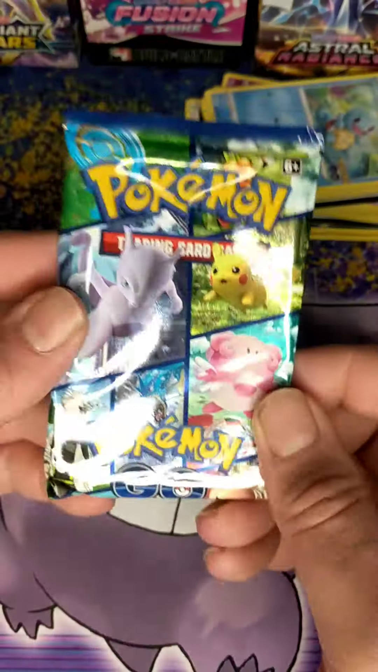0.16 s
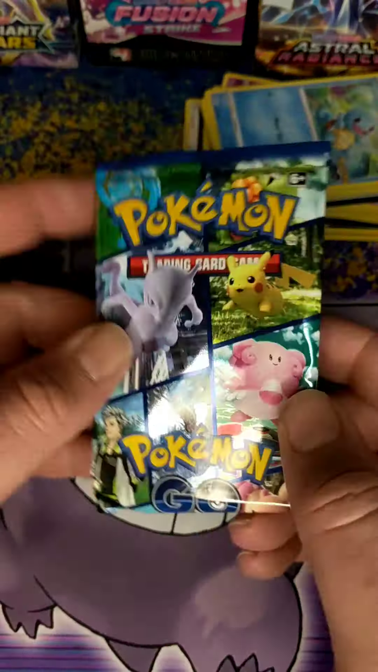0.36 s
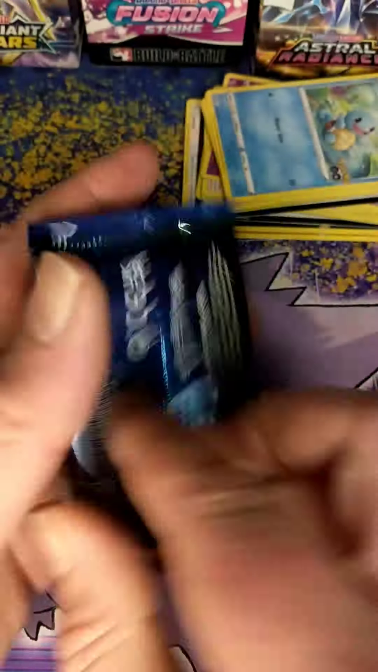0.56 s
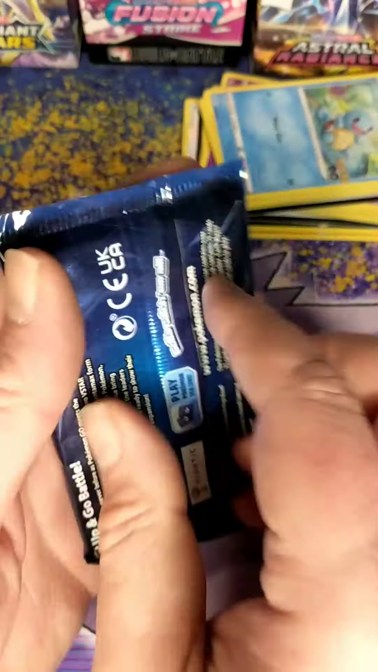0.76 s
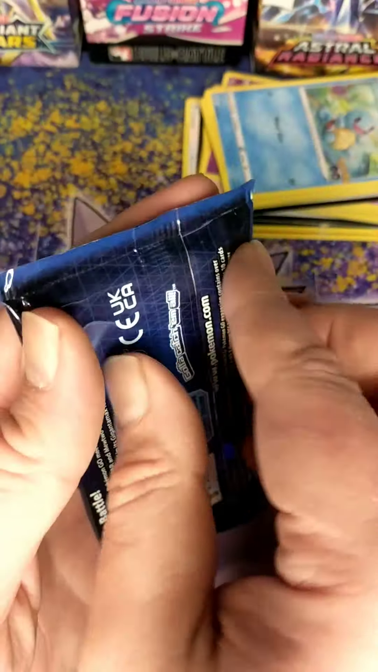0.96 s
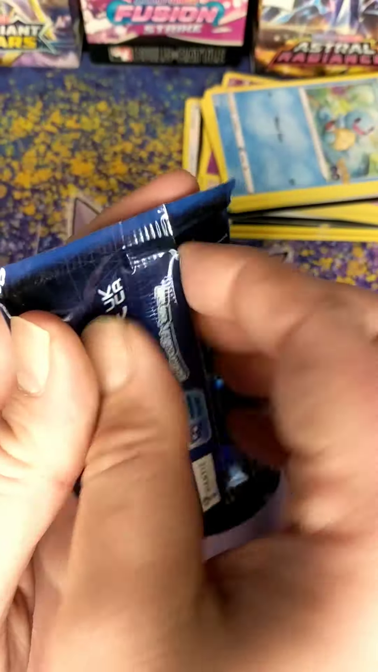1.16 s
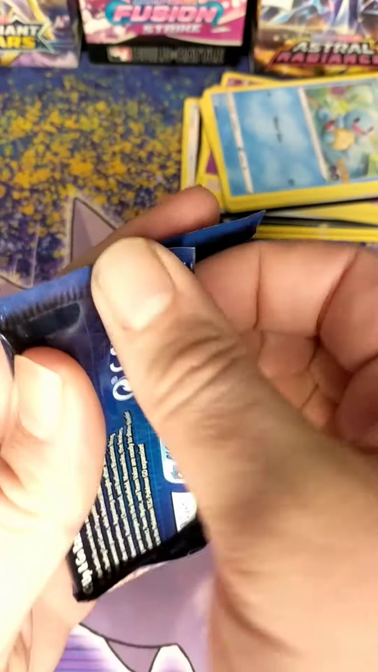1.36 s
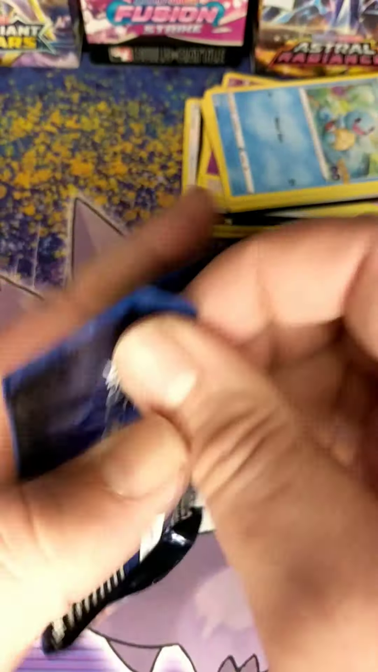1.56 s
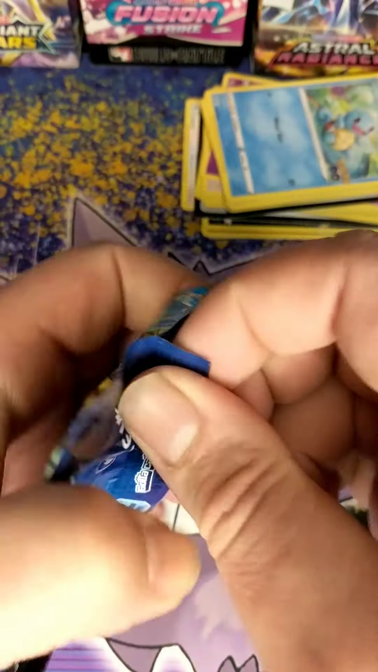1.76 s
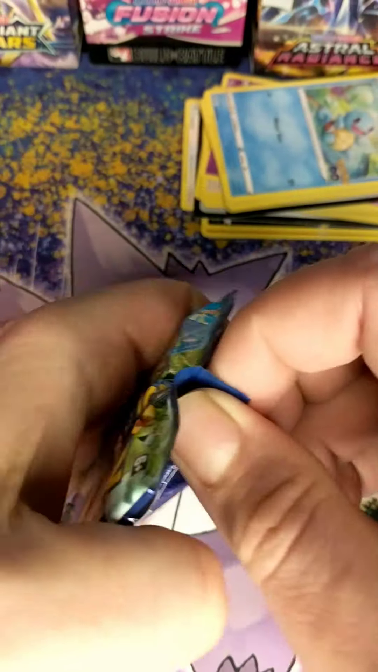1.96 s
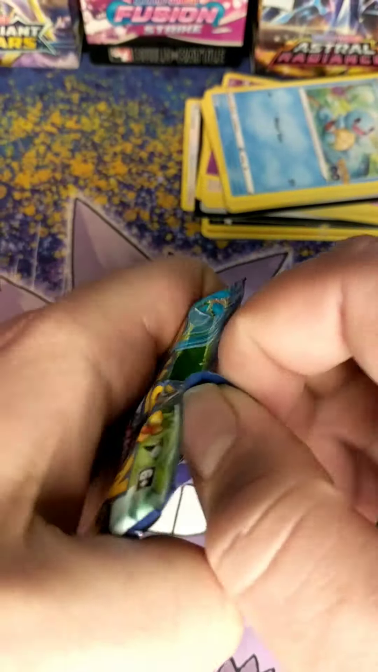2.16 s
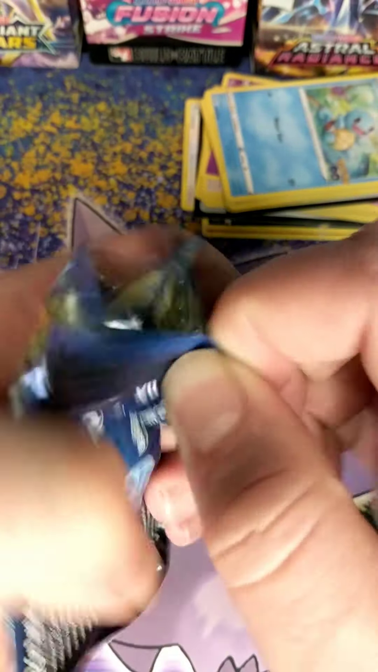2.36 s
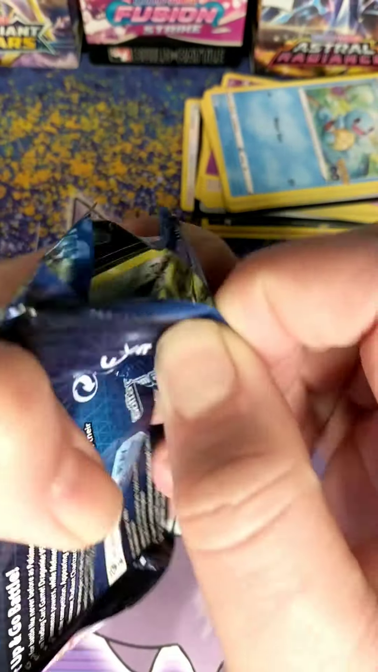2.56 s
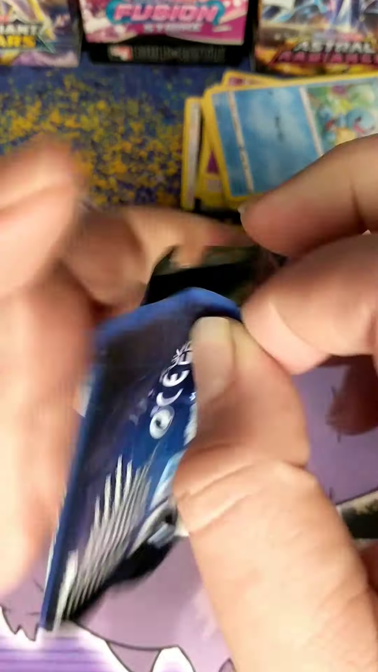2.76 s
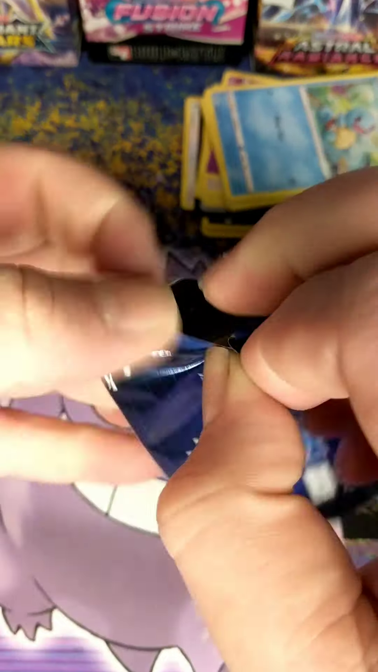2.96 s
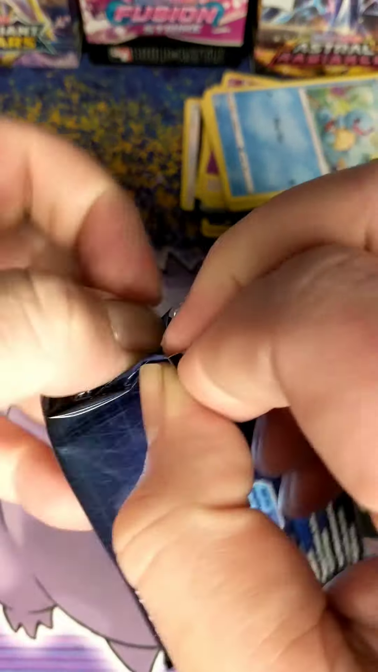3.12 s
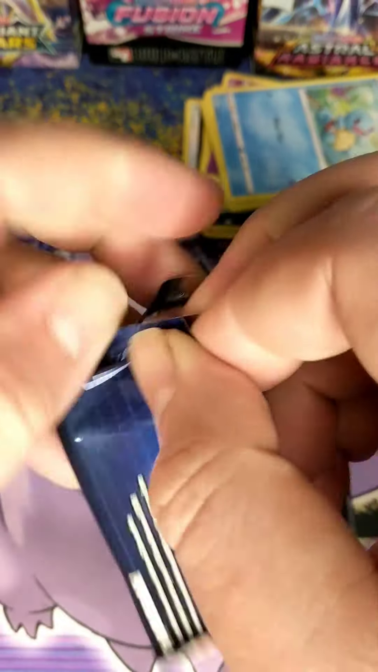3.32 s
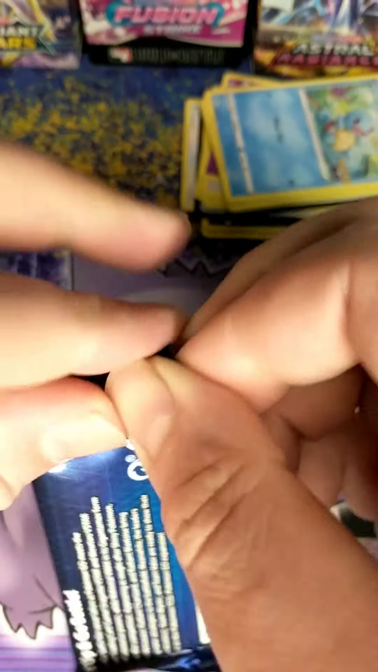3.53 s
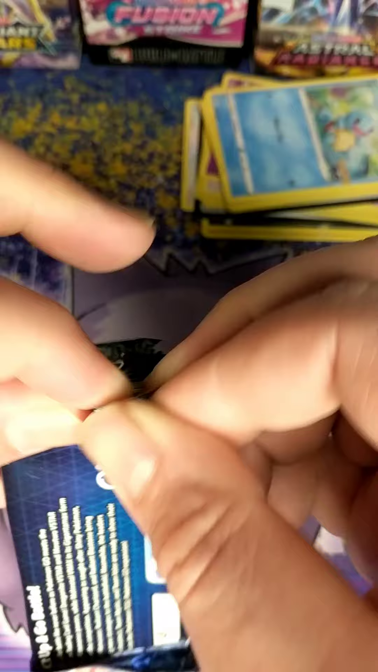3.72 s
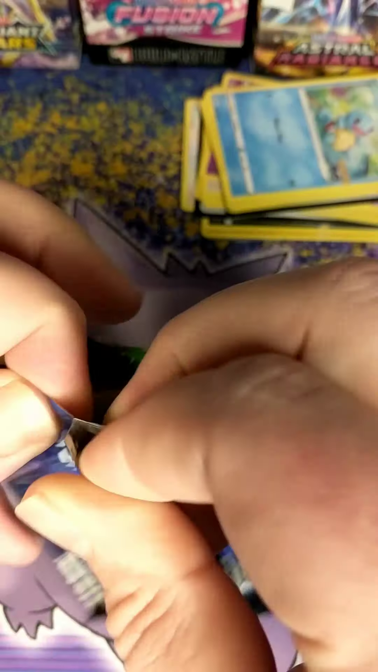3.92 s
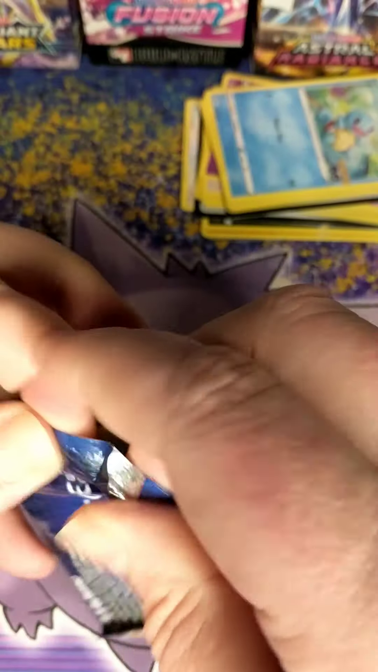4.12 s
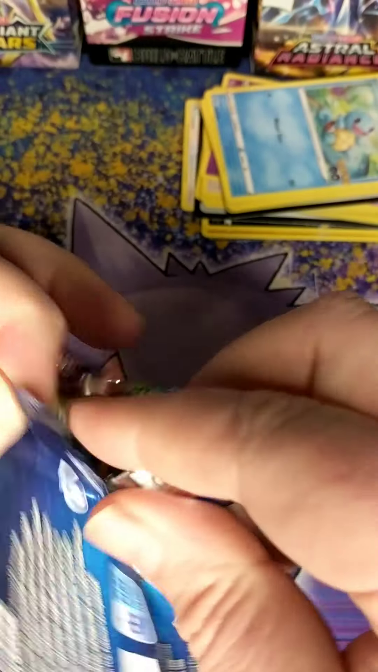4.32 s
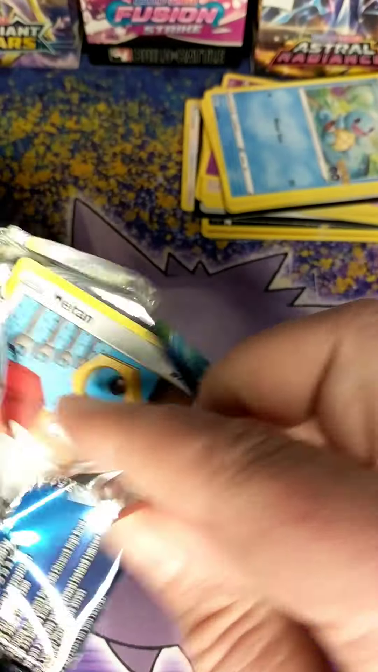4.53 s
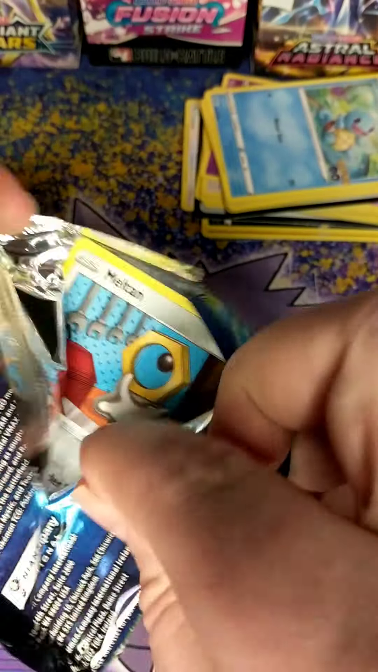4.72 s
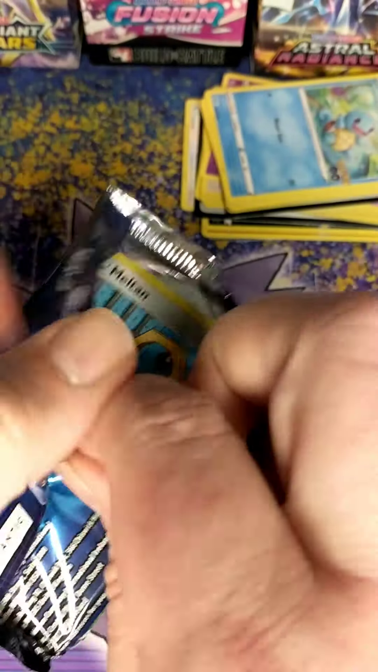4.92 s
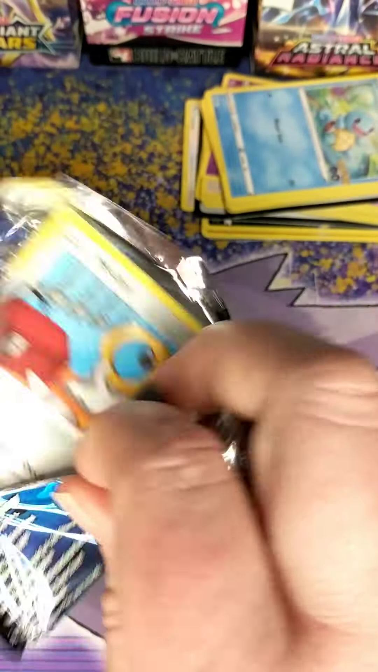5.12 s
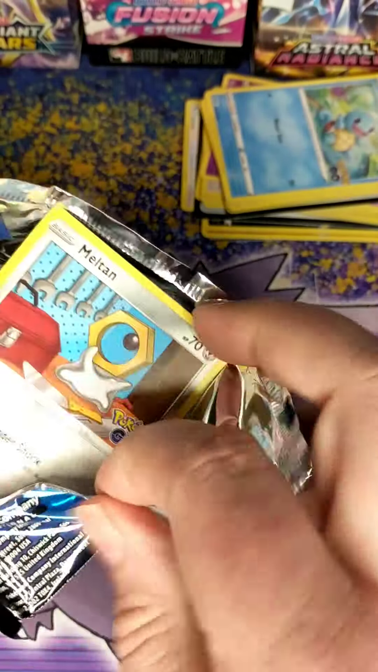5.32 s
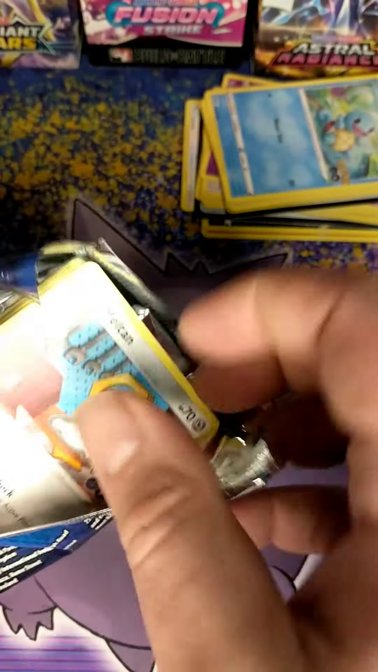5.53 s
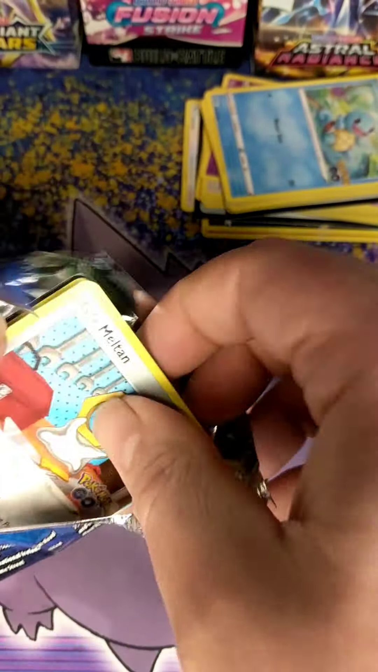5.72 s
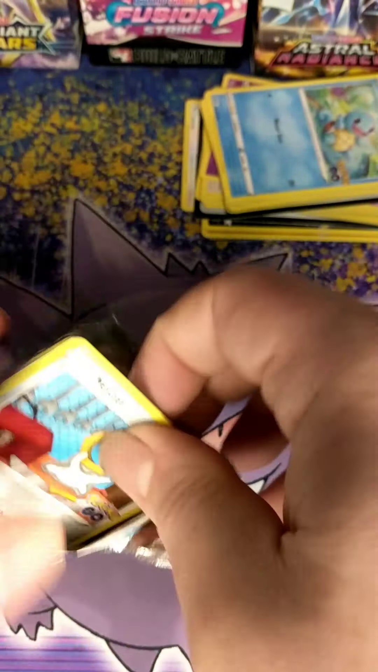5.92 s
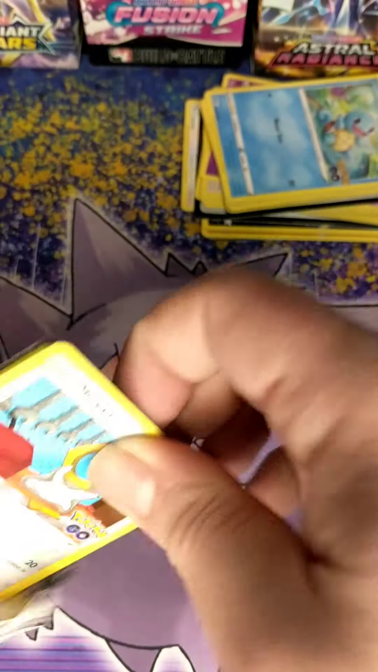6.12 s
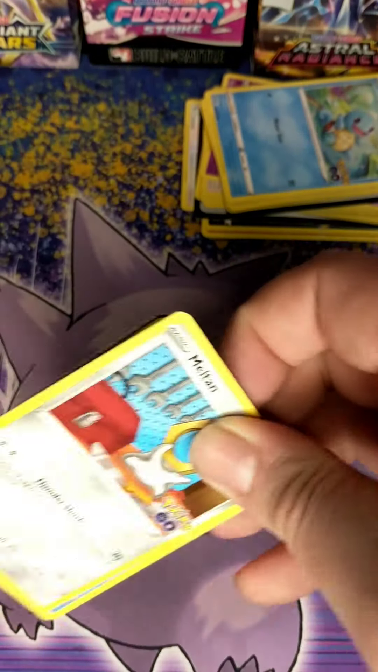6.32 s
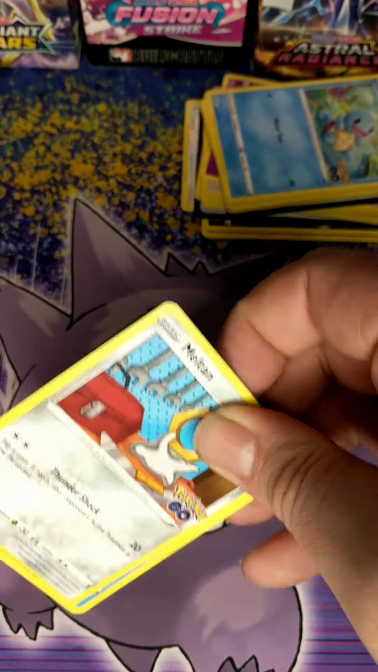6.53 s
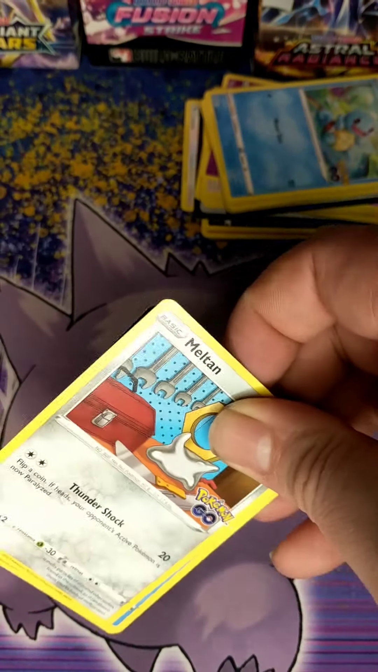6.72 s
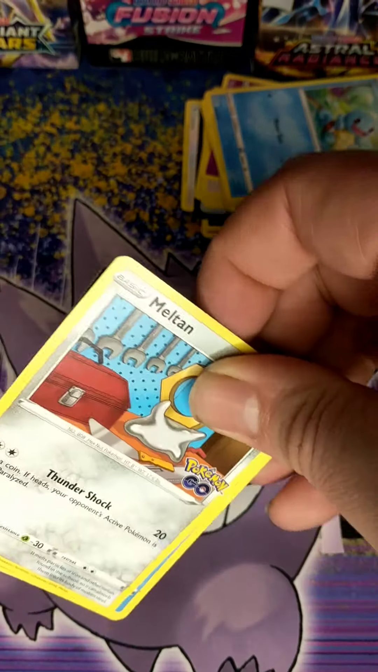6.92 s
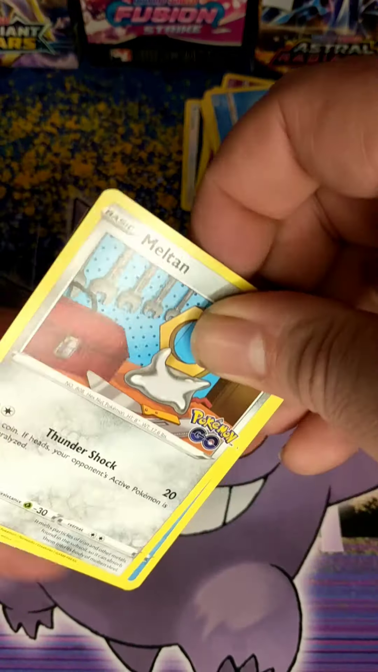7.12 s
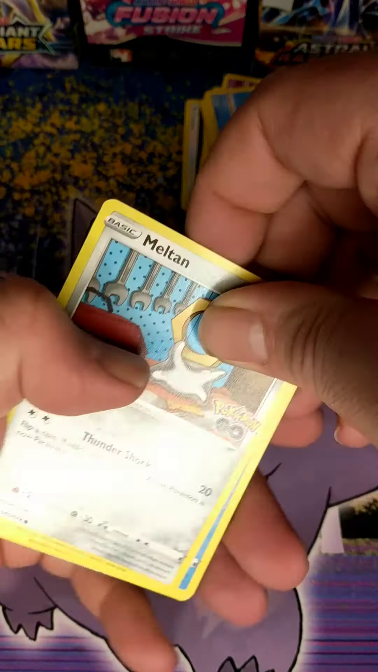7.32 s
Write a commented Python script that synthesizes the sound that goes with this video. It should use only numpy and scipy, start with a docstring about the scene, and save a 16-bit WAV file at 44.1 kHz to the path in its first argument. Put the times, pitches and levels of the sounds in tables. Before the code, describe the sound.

Bright, dry foil crinkling, close-miked indoors. Sharp single buckles stand out over fine crackle and soft skin rubbing. The loudest moment is a hard crack with a low puff of air around a third of the way in. A calmer stretch follows, then busy rustling with brief rips and hollow card scraping, ending in near silence over a low hum and quiet air.

```python
"""Opening a foil card pack

Hands squeeze a foil pack close to a microphone, run a nail over its crimp, tear it and slide the cards.
Stiff film buckles in single snaps over swarms of tiny creases, each a short coloured click; the nail and
the tears are fast runs of clicks. Skin rubs as a soft hiss, air puffs as a damped swing, and card edges
scrape as ringing noise. A small, dead room adds a weak echo, with a fan's low rush and a hum behind."""
import sys
import numpy as np
from scipy import signal
from scipy.fft import rfft, irfft, next_fast_len
from scipy.io import wavfile
from scipy.ndimage import uniform_filter1d, map_coordinates

SR = 44100
rng = np.random.default_rng(int(sys.argv[2]) if len(sys.argv) > 2 else 0)


def int16_out(signal):
    """Quantize to a 16-bit WAV file."""
    q = np.round(np.clip(np.atleast_2d(signal).T, -1, 1) * 32767)
    wavfile.write(sys.argv[1], SR, q.astype(np.int16))


N = 329850
TIME = np.arange(N) / SR  # seconds

# Background air. Each row: frequency in Hz, relative strength in dB per Hz.
AIR_SPECTRUM = [(20, -41), (40, -25.5), (62, -2.5), (85, 2.5), (115, -12), (200, -14), (270, -12),
                (360, -18), (700, -20), (1200, -25.5), (2000, -25), (5000, -35), (10000, -40.5),
                (15500, -48.5)]
# Steady hum. Each row: frequency in Hz, rms level in dB.
HUM_TONES = [(84, -60.5), (120, -63), (166, -62.5), (240, -60)]
# Steady strain of holding the pack. Each row: time in seconds, flexing in dB.
GRIP = [(0, -63), (.25, -73), (.5, -63.5), (.75, -51), (1.03, -61), (1.33, -47), (1.55, -47.5), (1.75, -58),
        (2.5, -61), (2.8, -43), (3.25, -48), (3.53, -56), (4.1, -50), (4.72, -44), (4.9, -59), (5.05, -44),
        (5.3, -45), (5.55, -53.5), (6.1, -48), (6.29, -68), (7.47, -71)]
# Fingers squeeze or pull the film. Each row: start in seconds, hold in seconds, flexing in dB.
SQUEEZES = [(0.061, .01, -42), (0.354, .05, -46), (0.523, .008, -41), (0.58, .03, -29), (.64, .055, -41),
            (0.826, .03, -42), (1.136, .045, -36), (1.40, .065, -37), (1.53, .05, -39), (1.925, .02, -40.5),
            (2.65, .125, -31), (2.843, .055, -33), (2.998, .025, -35), (3.08, .05, -35), (3.202, .07, -40),
            (3.386, .1, -36), (3.565, .02, -38.5), (3.635, .018, -28), (3.775, .04, -40),
            (3.977, .018, -33), (4.137, .06, -44), (4.311, .035, -29), (4.36, .055, -26),
            (4.548, .006, -35), (4.586, .02, -31), (4.765, .035, -30), (5.055, .05, -30),
            (5.135, .058, -28), (5.331, .015, -35), (5.441, .025, -30), (5.91, .03, -31), (5.99, .19, -33),
            (6.188, .07, -36), (6.449, .035, -56), (7.166, .03, -56), (7.388, .03, -59)]
# Every finger move and every scrape builds up and relaxes at the same pace.
BUILD_DB_PER_S, RELAX_DB_PER_S = 900, 600.5
# The film goes on creasing after a snap: level against the snap, upper limit, speed of fading.
SETTLE_DB, SETTLE_MOST_DB, SETTLE_DB_PER_S = -20, -39, 431
# Colour of a tiny crease. Each row: frequency in Hz, relative strength in dB per Hz.
CREASE_SPECTRUM = [(100, -8), (350, -7), (700, -4.5), (1400, -3), (2600, -1.5), (4500, 0.5), (7000, -2.5),
                   (10500, -4), (13500, -4.5), (16000, -8.5)]
# Tight creases are bright, loose film is dull. Each row: time in seconds, brightness in dB per octave.
TAUTNESS = [(.6, 0.5), (1.3, 2), (2.4, -3), (2.9, 4), (3.2, -1), (3.9, -0.5), (4.55, 0), (4.95, 1.5),
            (5.08, 2.5), (5.5, -4), (6.1, 0)]
# Colour of a flipping facet. Each row: frequency in Hz, relative strength in dB per Hz.
FACET_SPECTRUM = [(100, -27.5), (350, -29.5), (650, -10.5), (1150, -7.5), (1700, 0), (2600, 2.5),
                  (4500, 3.5), (8000, 1.5), (11000, -2), (15500, -4.5)]
# Air resonances of the hollow pack. Each row: frequency in Hz, width in Hz, gain in dB.
POUCH_MODES = [(1100, 1000, -6.5), (2470, 140, 1.5)]
# How strongly the hollow pack colours the rustle. Each row: time in seconds, strength, about 0.8 to 1.
POUCH_STRENGTH = [(4.3, 1), (4.48, 0.8), (4.95, 0.9), (5.8, 1)]
# Loud buckles. Each row: start in seconds, rms level in dB over 5 ms,
# centre of the colour boost in Hz (low for dull snaps, high for bright ones), brightness in dB per octave.
SNAPS = [(.385, -31.5, 1002, 3), (0.5804, -27.5, 3620, 3.5), (0.5995, -18.5, 685, 1.5),
         (0.7152, -16, 2000, 0.5), (0.7489, -29, 1920, -3.5), (.846, -20, 4980, 1),
         (0.9712, -25.5, 5300, -4.5), (1.0642, -22, 2800, 3.5), (1.1312, -13.5, 3040, 1),
         (1.2353, -25.5, 3800, -2.5), (1.2444, -12.5, 9200, 8.5), (1.357, -30.5, 860, -3.5),
         (1.39, -17.5, 3850, 1), (1.3953, -19, 5430, -4.5), (1.408, -26, 850, -5), (1.424, -29.5, 800, -3),
         (1.4419, -12.5, 6840, 10.5), (1.4538, -21.5, 690, 1), (1.4802, -21, 5840, -2),
         (1.506, -19, 13300, 1), (1.5271, -15.5, 704, 3.5), (1.547, -24.5, 714, 7), (1.5971, -14.5, 700, 6),
         (1.6335, -17.5, 11400, -5), (1.686, -24.5, 670, -.5), (1.788, -25, 1970, 2),
         (1.8269, -21.5, 2050, 2), (1.834, -26, 3130, 1), (1.908, -25.5, 785, -4),
         (1.937, -24.5, 10100, -1.5), (2.0129, -21, 756, 0.5), (2.1348, -24, 4000, -3),
         (2.251, -14.5, 6600, -0.5), (2.305, -18.5, 12800, -1), (2.3417, -24, 3000, -0.5),
         (2.344, -13, 12900, -5), (2.36, -7, 2780, 4), (2.368, -14, 3470, 0.5), (2.3844, -17, 2330, 0.5),
         (2.516, -25, 704, 1.5), (2.56, -29, 4600, -3), (2.6511, -19.5, 6350, -4.5),
         (2.6657, -16.5, 701, 4.5), (2.6907, -14.5, 3950, -5.5), (2.7497, -26, 12300, -3.5),
         (2.7696, -22, 700, 2), (2.8114, -23.5, 7440, -2), (2.936, -27, 7270, 5.5),
         (2.9505, -17, 7500, 6.5), (2.9572, -15.5, 7300, 4.5), (2.964, -18, 7160, 5.5),
         (3.007, -21.5, 650, 1.5), (3.0253, -32.5, 14000, 0), (3.056, -23, 1500, 2.5),
         (3.1113, -26, 3200, 2), (3.1249, -20.5, 885, -1), (3.207, -31.5, 1660, -1.5),
         (3.407, -26, 12000, -1.5), (3.4561, -24.5, 6440, 6), (3.5379, -24, 3810, 2),
         (3.659, -20, 12400, -5.5), (3.7564, -21, 1650, 0.5), (3.8, -24, 2420, -2), (3.9768, -16, 696, 6.5),
         (3.9908, -20, 1250, 0.5), (4.0726, -31, 1550, -2.5), (4.222, -22, 9300, -1),
         (4.2303, -27, 6700, 4.5), (4.2806, -24, 2350, -1), (4.3061, -23.5, 3450, -2.5),
         (4.3166, -15.5, 12800, -0.5), (4.3235, -19, 12500, -3), (4.3393, -22, 3000, -5),
         (4.3571, -18, 2050, 0.5), (4.4015, -15.5, 2480, 1), (4.4135, -18.5, 2780, 2),
         (4.4617, -18, 2570, -6), (4.5134, -17.5, 2500, -5.5), (4.611, -24.5, 4300, 4),
         (4.6775, -25, 1120, -0.5), (4.7471, -15, 2700, -5.5), (4.849, -26, 2700, 1),
         (4.949, -23, 2730, -6.5), (4.9662, -14, 960, -4), (4.9943, -25.5, 3000, -1),
         (5.0308, -14, 2900, 8), (5.131, -12, 12900, 2.5), (5.1605, -16.5, 710, 0),
         (5.2267, -19, 8360, -1.5), (5.2753, -25, 1190, -3), (5.319, -26.5, 2640, -4.5),
         (5.3826, -26, 1251, -8), (5.446, -14.5, 2150, -0.5), (5.4578, -22, 1730, -1),
         (5.466, -21, 1070, -8.5), (5.5436, -22.5, 1450, -3), (5.587, -29.5, 2580, 0.5),
         (5.6605, -24, 4320, -7), (5.7094, -17, 8100, -6), (5.7655, -24, 4460, -6.5),
         (5.8417, -25.5, 3450, 1.5), (5.8653, -20.5, 2600, -2), (5.879, -18, 2550, -0.5),
         (5.934, -29.5, 2800, -3), (5.977, -16, 700, 2.5), (6.013, -24.5, 1800, 0.5),
         (6.0282, -20, 9000, 0.5), (6.0435, -23, 3610, 2), (6.1221, -19, 12500, -6),
         (6.186, -22, 4000, -3.5), (6.238, -29, 4000, -1.5), (6.263, -30.5, 4200, 2.5),
         (6.3567, -47.5, 7250, -5), (6.5352, -32.5, 4520, 7.5), (6.774, -38.5, 2500, 1)]
# Pushes of air from the pack. Each row: start in seconds, level in dB.
PUFFS = [(0.599, -32.5), (2.3435, -19.5), (2.665, -36), (2.69, -32.5), (2.751, -30.5)]
# Fast runs of clicks: a nail drawn over the crimp ribs, or film tearing. Each row: start in seconds,
# length in seconds, clicks per second, starting level in dB, starting centre of the colour boost in Hz,
# average brightness in dB per octave.
CLICK_RUNS = [(1.267, 0.042, 430, -28, 3500, 1), (2.352, 0.0067, 1200, -18.5, 4000, 1),
              (2.3577, 0.031, 1270, -16.5, 2500, -2), (2.858, 0.057, 440, -32, 6000, 5.5),
              (4.362, 0.058, 340, -24.5, 2820, -4.5), (5.143, 0.048, 480, -26, 2900, -4.5)]
# Cards scrape inside the pack. Each row: start in seconds, hold in seconds, rms level in dB.
SCRAPES = [(4.475, 0.01, -34), (4.594, 0.009, -39), (4.695, 0.15, -42.5), (4.76, 0.039, -34.5),
           (4.877, .07, -46), (4.944, 0.0068, -29.5), (5.46, 0.018, -42)]
# What a scrape rings with. Each row: frequency in Hz, width in Hz, relative strength in dB.
SCRAPE_MODES = [(940, 610, -4), (1394, 500, -6), (2580, 630, -1.5)]
# Decay of the room. Each row: frequency in Hz, seconds to fade by 60 dB.
ROOM_DECAY = [(200, 0.44), (2500, 0.11), (14000, 0.032)]
TOP_HZ = 15900  # the microphone's upper limit


def amp(db):
    """Turn dB into a plain multiplier."""
    return 10 ** (np.asarray(db) / 20)


def unit(x):
    """Scale each row to rms 1."""
    return x / np.sqrt(np.mean(x ** 2, axis=-1, keepdims=True) + 1e-20)


def along(points, hz):
    """Read (Hz, value) points on a log frequency axis."""
    f, v = np.transpose(points)
    return np.interp(np.log(hz + 1), np.log(f), v)


def curve(rows, s):
    """Read (seconds, value) rows at the times s."""
    return np.interp(s, *np.transpose(rows))


def wobble(rate):
    """A smooth random curve with this many random points a second."""
    knots = rng.standard_normal(int(N * rate / SR) + 4)
    return map_coordinates(knots, [TIME * rate])


def filtered(x, response):
    """Multiply the spectrum of x by a function of frequency."""
    m = next_fast_len(N + SR // 2)
    return irfft(rfft(x, m) * response(np.fft.rfftfreq(m, 1 / SR)), m)[:N]


def resonances(x, modes):
    """Pass x through a set of (Hz, width Hz, dB) resonances, side by side."""
    def response(f):
        return sum(amp(db) * 1j * f * width / (centre * centre - f * f + 1j * f * width)
                   for centre, width, db in modes)
    return filtered(x, response)


def causal(gain_db):
    """Minimum-phase responses with these gains: a sharp start, then ringing."""
    cepstrum = irfft(np.log(amp(gain_db)))
    half = cepstrum.shape[-1] // 2
    cepstrum[:, 1:half] *= 2
    cepstrum[:, half + 1:] = 0
    return np.exp(rfft(cepstrum))


def placed(times, waves):
    """Add up short waves, one row each, starting at the given times in seconds."""
    first = np.round(np.maximum(times, 0) * SR).astype(int)
    index = first[:, None] + np.arange(waves.shape[1])
    return np.bincount(index.ravel(), waves.ravel(), N)[:N]


def stroke(start, hold, db):
    """The level in dB of one move: it builds up, holds and relaxes."""
    before = BUILD_DB_PER_S * (start - TIME)
    after = RELAX_DB_PER_S * (TIME - start - hold)
    return db - np.maximum(np.maximum(before, after), 0)


def buckles(spectrum, boost_hz, tilt, boost_db, boost_octaves, flutter_db, flutter_t60, size=512, lag_s=.0005):
    """Clicks of energy 1: a facet flips and bending waves flutter over the film, the low ones lagging."""
    t, hz = np.arange(size) / SR, np.fft.rfftfreq(size, 1 / SR)
    # one sharp push, then fading noise for the flutter
    push = rng.standard_normal((len(tilt), size)) * amp(flutter_db - 60 * t / flutter_t60)
    push[:, 0] = 1
    octaves_away = np.log2((hz + 1) / boost_hz[:, None])
    boost = boost_db / (1 + (octaves_away / boost_octaves) ** 2)
    brightness = tilt[:, None] * np.log2(np.maximum(hz, 500))
    colour = along(spectrum, hz) + boost + brightness
    lag = np.exp(-4j * np.pi * lag_s * np.sqrt(1000 * hz))  # delay is lag_s at 1000 Hz, longer below
    return unit(irfft(rfft(push) * causal(colour) * lag)) / np.sqrt(size)


def background():
    """A fan's low rush is shaped noise; the hum is a few tones with slightly unsteady phase."""
    rush = unit(filtered(rng.standard_normal(N), lambda hz: amp(along(AIR_SPECTRUM, hz))))
    hum = np.zeros(N)
    for hz, db in HUM_TONES:
        phase = 2 * np.pi * hz * TIME + 0.26 * wobble(5.4)
        hum += amp(db) * np.sqrt(2) * np.sin(phase)
    return amp(-53.5) * rush + hum


def flexing():
    """How hard the film is worked, in dB: the strongest of grip, squeezes and settling after snaps."""
    flex_db = curve(GRIP, TIME)
    for row in SQUEEZES:
        flex_db = np.maximum(flex_db, stroke(*row))
    t = TIME[:SR // 8]
    for start, db, *_ in SNAPS:
        after = slice(int(start * SR), int(start * SR) + len(t))
        settling = min(db + SETTLE_DB, SETTLE_MOST_DB) - SETTLE_DB_PER_S * t
        flex_db[after] = np.maximum(flex_db[after], settling)
    return flex_db


def rubbing(flex_db, patchy_db=3.0, level_db=-55, grows=0.55, unsteady_db=5.5):
    """Skin and cards slide on the film: a soft hiss of shifting colour, louder with harder flexing."""
    z = signal.stft(rng.standard_normal(N), nperseg=512)[2]
    # random patches, smoothed over frequency and then over time
    field = uniform_filter1d(rng.standard_normal(z.shape), size=7, axis=0)
    field = uniform_filter1d(field, size=12, axis=1)
    patchy = signal.istft(z * amp(patchy_db * field / field.std()), nperseg=512)[1][:N]
    hiss = unit(filtered(patchy, lambda hz: amp(along(CREASE_SPECTRUM, hz))))
    return hiss * amp(level_db + grows * (flex_db + 46) + unsteady_db * wobble(60))


def crinkle(flex_db, scatter_db=11, denser_db=38, count=1900):
    """Swarms of tiny creases: harder flexing makes them both louder and denser."""
    chance = np.cumsum(10 ** (flex_db / denser_db))
    s = np.interp(rng.random(count), chance / chance[-1], TIME)
    strength = amp(scatter_db * rng.standard_normal(count))
    boost_hz = 3200 * np.exp(0.877 * rng.standard_normal(count))
    tilt = curve(TAUTNESS, s) + 1.6 * rng.standard_normal(count)
    clicks = buckles(CREASE_SPECTRUM, boost_hz, tilt, boost_db=10, boost_octaves=0.14,
                     flutter_db=-14.5, flutter_t60=0.016)
    # neighbouring creases share the energy that the fingers put in
    shared = np.abs(uniform_filter1d(placed(s, strength[:, None] ** 2), size=1400))
    strength = strength / np.sqrt(np.interp(s, TIME, shared) + 0.0013)
    level = strength * amp(np.interp(s, TIME, flex_db))
    return placed(s, clicks * level[:, None])


def stray_snaps(flex_db, over_db=7, scatter_db=5.5, denser_db=70, ceiling_db=-32, count=150):
    """Lesser buckles come by chance, more often and louder where the film is worked harder."""
    chance = np.cumsum(10 ** (flex_db / denser_db))
    draws = (np.arange(count) + rng.random(count)) / count
    s = np.interp(draws, chance / chance[-1], TIME)
    size, pitch, colour = rng.standard_normal((count, 3)).T
    db = np.minimum(np.interp(s, TIME, flex_db) + over_db + scatter_db * size, ceiling_db)
    boost_hz = 3000 * np.exp(.7 * pitch)
    tilt = curve(TAUTNESS, s) - 1.5 + 3.0 * colour
    clicks = buckles(FACET_SPECTRUM, boost_hz, tilt, boost_db=13, boost_octaves=0.74,
                     flutter_db=-20.0, flutter_t60=0.015)
    span = np.sqrt(.005 * SR)  # turns energy 1 into rms 1 over 5 ms
    return placed(s, clicks * span * amp(db)[:, None])


def pouch(x):
    """The hollow pack colours the rustle with its air resonances, at a slowly changing strength."""
    return x + curve(POUCH_STRENGTH, TIME) * resonances(x, POUCH_MODES)


def snaps(follow_db=-21, follow_most_db=-36, follow_s=0.0093, count=2):
    """Loud single buckles; each shifts the stress and sets off a few small ones just after it."""
    s, db, boost_hz, tilt = np.transpose(SNAPS)
    span = np.sqrt(.005 * SR)  # turns energy 1 into rms 1 over 5 ms
    clicks = buckles(FACET_SPECTRUM, boost_hz, tilt, boost_db=13, boost_octaves=0.28,
                     flutter_db=-18.5, flutter_t60=0.013)
    out = placed(s, clicks * span * amp(db)[:, None])
    for _ in range(count):
        chance = rng.standard_normal((len(s), 3))
        s = s + follow_s * np.exp(.5 * chance[:, 0])
        small_boost_hz = 3200 * np.exp(.5 * chance[:, 1])
        clicks = buckles(FACET_SPECTRUM, small_boost_hz, tilt / 2 - 1.5, boost_db=8.5, boost_octaves=0.24,
                         flutter_db=-13.5, flutter_t60=0.0057)
        small_db = np.minimum(db + follow_db, follow_most_db) + 2.4 * chance[:, 2]
        out += placed(s, clicks * span * amp(small_db)[:, None])
    return out


def puffs(swing_hz=68, t60=0.062, slap_db=5, slap_t60=0.0092):
    """The pack pops wide: a short suck of air together with a slow, quickly damped swing."""
    s, db = np.transpose(PUFFS)
    t = np.arange(SR // 8) / SR
    swing = np.sin(2 * np.pi * swing_hz * t) * amp(-60 * t / t60)
    slap = 4 * (1 - np.exp(-t / 0.00079)) * amp(slap_db - 60 * t / slap_t60)
    return placed(s, amp(db)[:, None] * (2.6 * swing - slap))


def click_runs(uneven=0.15, scatter_db=5.0):
    """A nail drawn over crimp ribs, or film tearing: a fast run of clicks that grows duller and softer."""
    out = np.zeros(N)
    for start, length, rate, db, hz, tilt in CLICK_RUNS:
        count = max(int(length * rate), 2)
        chance = rng.standard_normal((count, 3))
        u = np.arange(count) / count  # progress along the run, from 0 towards 1
        s = start + length * u + uneven * chance[:, 0] / rate
        boost_hz = hz * np.exp(0.14 * chance[:, 1] - u / 2)
        clicks = buckles(FACET_SPECTRUM, boost_hz, tilt + 2 - 4 * u, boost_db=0.5, boost_octaves=0.49,
                         flutter_db=-19.0, flutter_t60=0.0067)
        # sqrt(SR / rate) turns click energy into the rms of the whole run
        size = amp(db + scatter_db * chance[:, 2] - 4.7 * u ** 2) * np.sqrt(SR / rate)
        out += placed(s, clicks * size[:, None])
    return out


def scrapes(grain_db=4, drift_db=3):
    """Card edges stick and slip on foil: uneven noise through steep resonances that drift in strength."""
    slips = rng.standard_normal(N) * amp(grain_db * wobble(700))
    ring = np.zeros(N)
    for hz, width, db in SCRAPE_MODES:
        # the same resonance twice makes its sides steep
        once = resonances(slips, [(hz, width, 0)])
        twice = resonances(once, [(hz, width, db)])
        ring += twice * amp(drift_db * wobble(15))
    level_db = np.max([stroke(*row) for row in SCRAPES], axis=0)
    return unit(ring) * amp(level_db)


def room(x):
    """The small room's answer: x smeared by fading noise whose treble dies away first."""
    hz, t, z = signal.stft(rng.standard_normal(SR // 3), SR, nperseg=256)
    fade = amp(-60 * t / along(ROOM_DECAY, hz)[:, None])
    tail = signal.istft(z * fade, SR, nperseg=256)[1]
    return signal.fftconvolve(x, tail / np.linalg.norm(tail))[:N]


def scene():
    """Foil and cards, close by in a small room."""
    behind = background()
    flex_db = flexing()
    rustle = rubbing(flex_db) + crinkle(flex_db) + stray_snaps(flex_db)
    foil = pouch(rustle) + snaps() + click_runs() + scrapes()
    return (foil + amp(-23) * room(foil) + puffs() + behind)[None]


def record(dry):
    """The microphone clips near full scale, then a steep filter removes what lies above its limit."""
    clipped = np.clip(dry[0], -.92, .92)
    return filtered(clipped, lambda hz: 1 / (1 + (hz / TOP_HZ) ** 160))[None]


dry = scene()
out = record(dry)
int16_out(out)
```